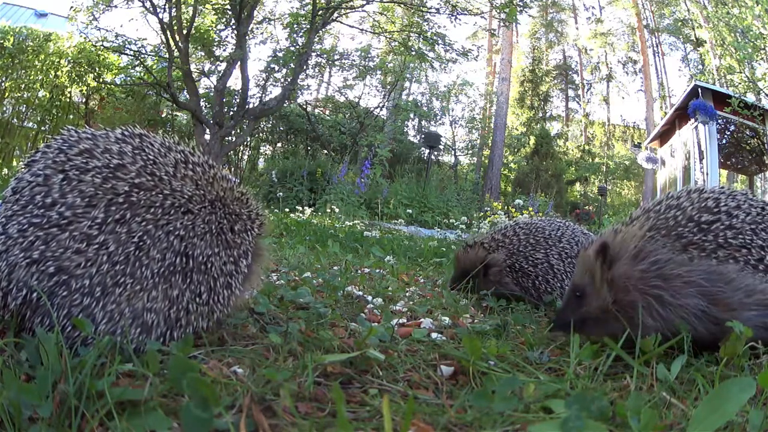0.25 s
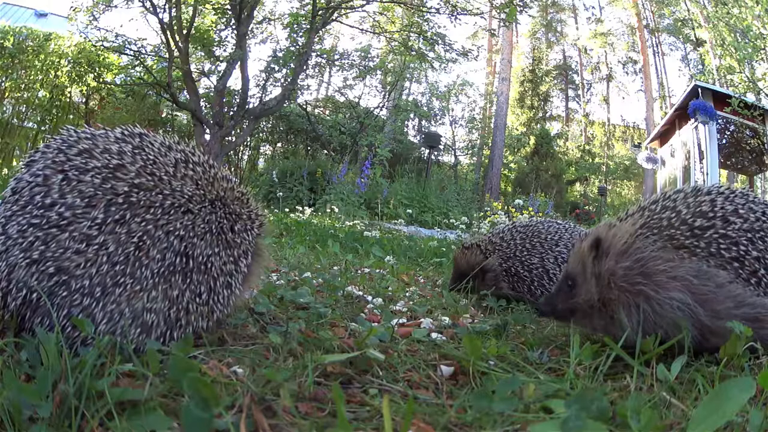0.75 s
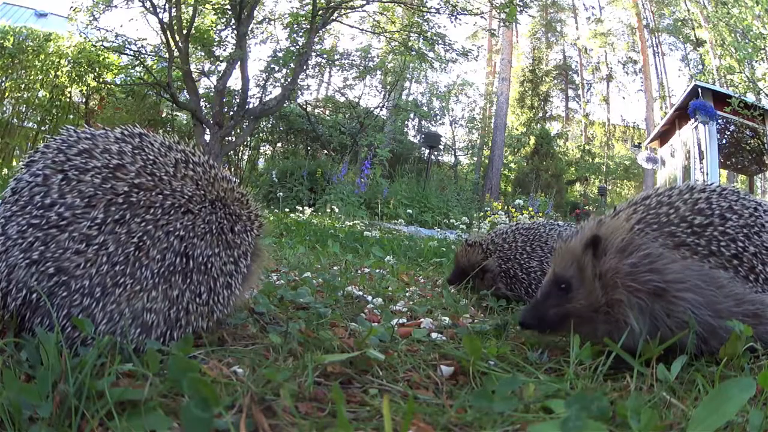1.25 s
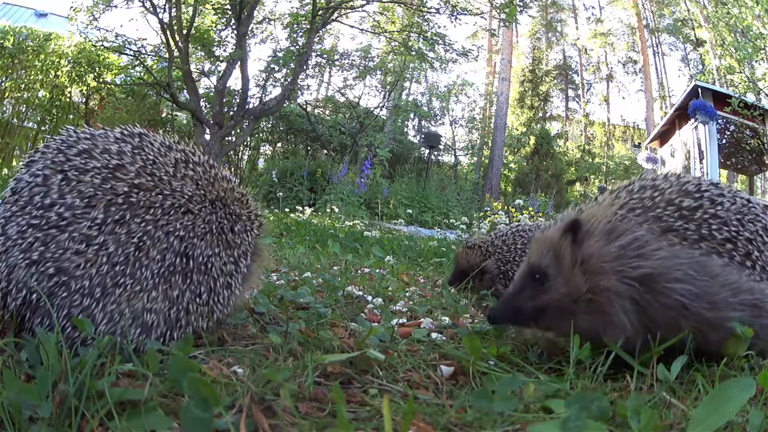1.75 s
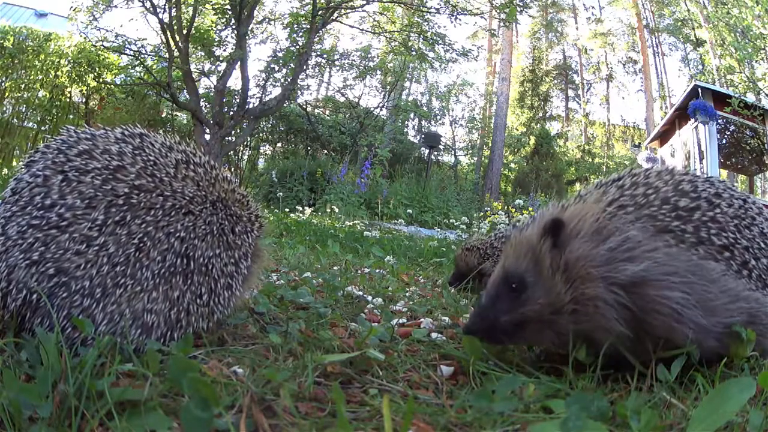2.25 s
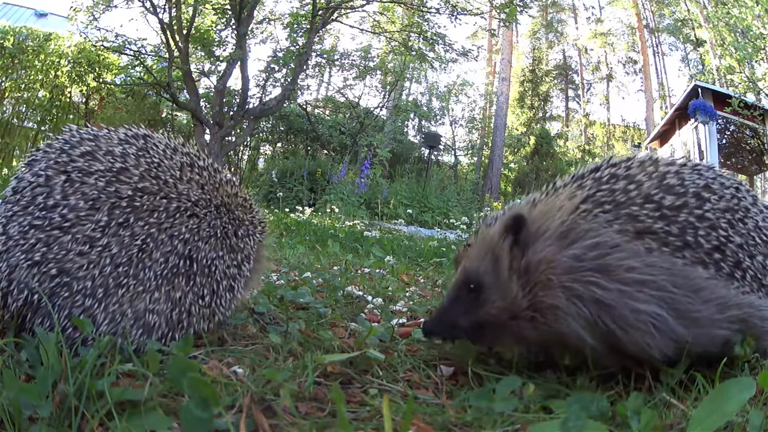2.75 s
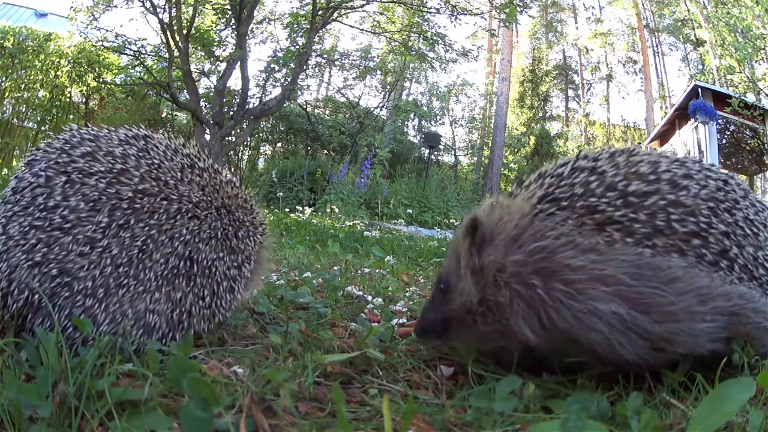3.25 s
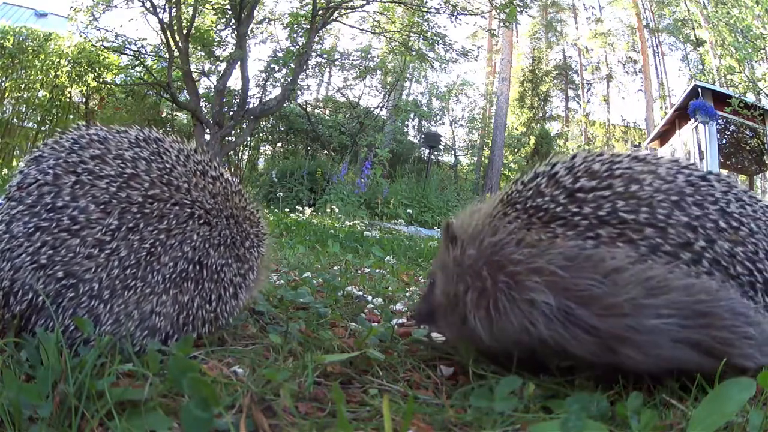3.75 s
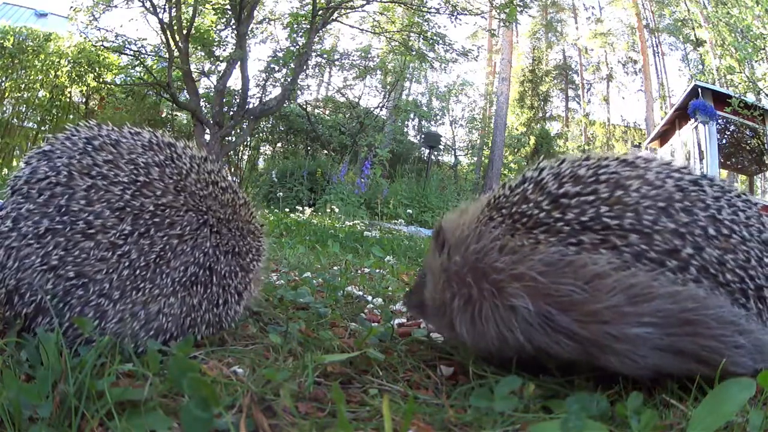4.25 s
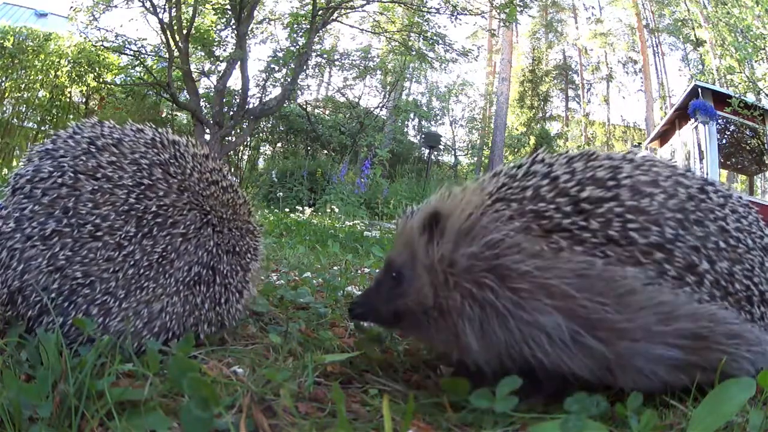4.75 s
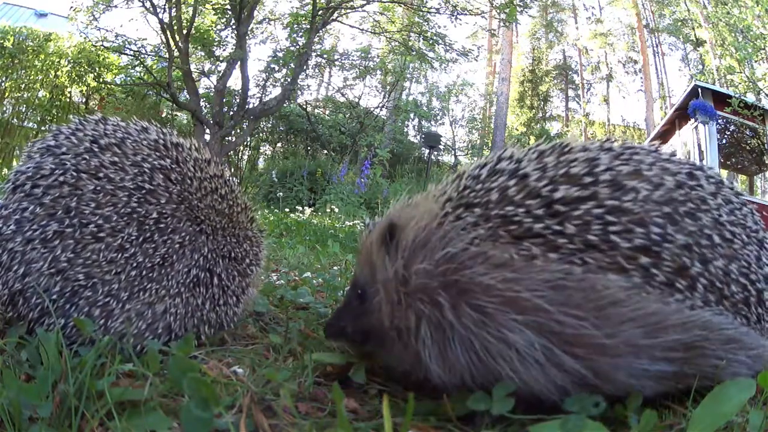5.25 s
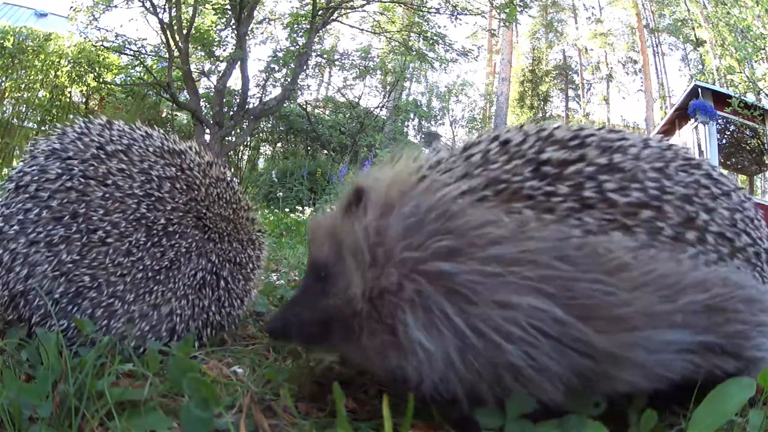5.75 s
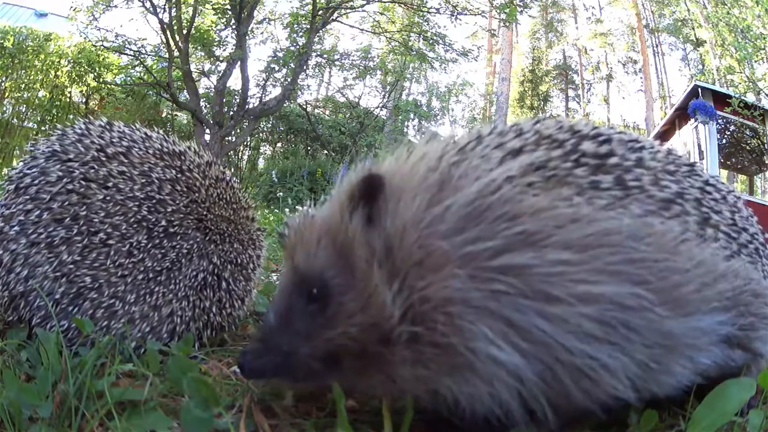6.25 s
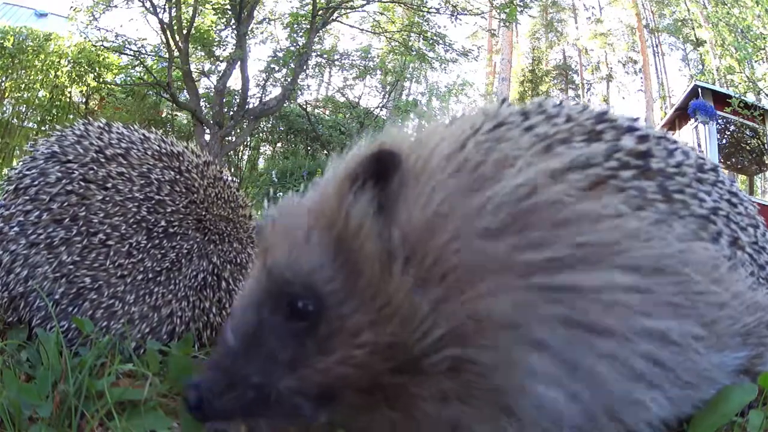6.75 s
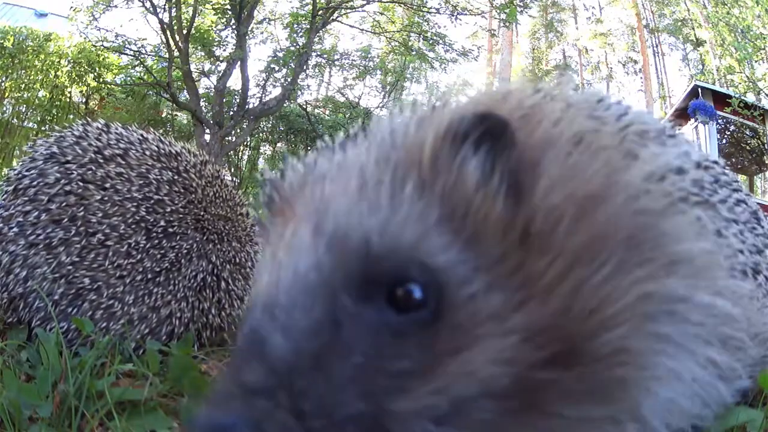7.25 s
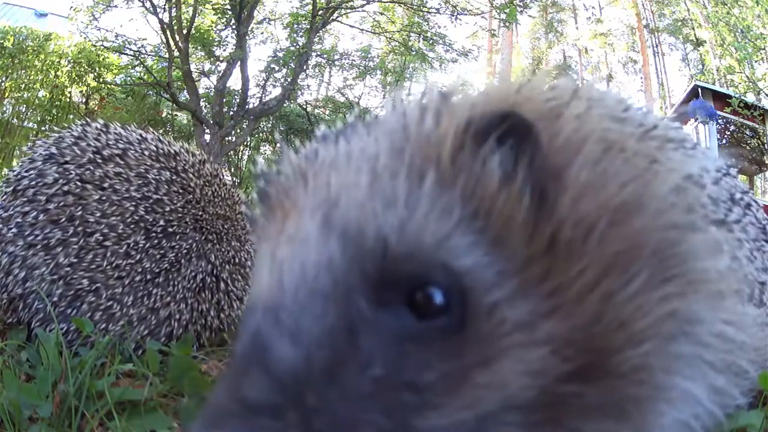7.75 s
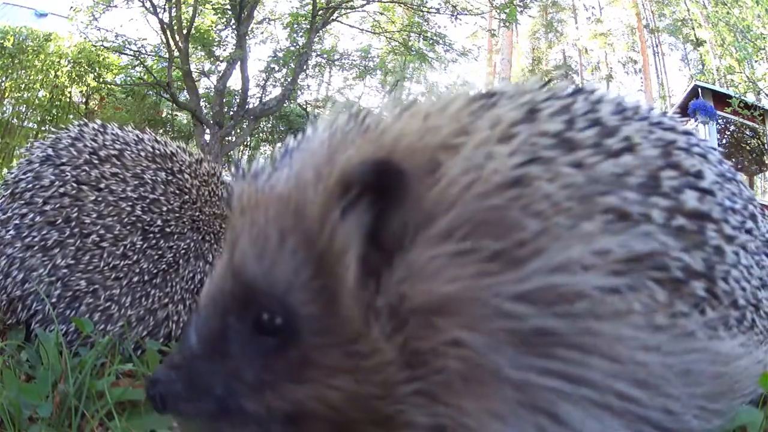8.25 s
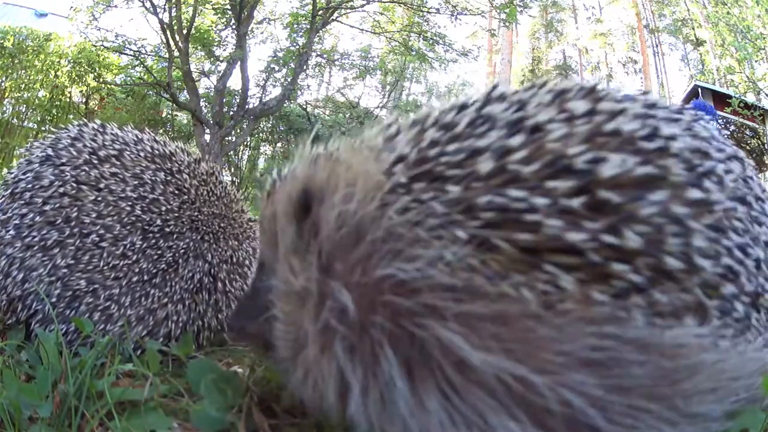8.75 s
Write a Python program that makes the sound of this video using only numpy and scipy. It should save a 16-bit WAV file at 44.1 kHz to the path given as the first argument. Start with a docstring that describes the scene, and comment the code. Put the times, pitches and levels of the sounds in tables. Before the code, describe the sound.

Outdoors in a quiet garden, a hedgehog gives short, sharp, noisy huffs about three a second. They start moderate, grow steadily as it walks from right to left toward a low microphone in the grass, peak very close and bright near seven seconds, then drop back. Light grass rustles, tiny crackles and dry stalk snaps accompany it, with a brief faint grunt and a distant harsh bird chatter.

```python
"""A hedgehog huffs about three times a second as it walks from right to left past a camera in the grass.
Each huff is a jet of noise through the snout: brighter when stronger, duller when the head turns away.
Noise bursts make the grass rustle, crackle and chirr; cracks with short rings make stalks snap.
Gliding sines make thin chirps, harmonics a small grunt from the left, rough noise a far magpie.
Shaped noise makes the faint steady rush and rumble of a garden."""
import sys
import numpy as np
from scipy import signal
from scipy.fft import rfft, irfft, next_fast_len
from scipy.io import wavfile
from scipy.ndimage import uniform_filter1d, map_coordinates

SR = 44100
rng = np.random.default_rng(int(sys.argv[2]) if len(sys.argv) > 2 else 0)


def transcribe(u):
    """Save the signal u as a 16-bit wav file named by the first command-line argument.

    u: samples, shape (n,) or (channels, n), limited to [-1, 1]; the rate is SR.
    q: integer samples, one column per channel.
    """
    v = np.clip(np.atleast_2d(u).T, -1, 1)
    q = np.round(v * 32767).astype(np.int16)
    wavfile.write(sys.argv[1], SR, q)


N = 396459

# Levels are relative: each source adds its own trim.
# garden spectrum: freq_hz, gain_db
GARDEN = [(18, -15), (30, -10), (64, -5), (150, -10), (620, -11.5), (1130, -14.5), (1700, -28), (2900, -32),
          (4200, -32.5), (5800, -39), (7200, -49), (10500, -49), (12500, -43.5), (16000, -45)]
# left-right likeness of the garden rush: freq_hz, correlation
ALIKE = [(60, 1), (180, 0.82), (550, 0.8), (1650, 0.051), (4970, 0.35), (15000, 1)]
# steps through the grass: start_s, length_s, level_db
RUSTLES = [(0.9, 0.16, -62.5), (1.37, 0.087, -68), (1.7, 0.12, -57), (2.12, 0.092, -59.5), (2.5, 0.14, -59),
           (3.35, 0.043, -46), (3.39, 0.12, -52.5), (4.08, 0.054, -63.5), (4.71, 0.051, -56.5),
           (5.05, 0.095, -58.5), (5.45, 0.14, -55), (6.11, 0.071, -57.5), (6.335, 0.066, -59),
           (8.44, 0.075, -64.5)]
# grass spectrum: freq_hz, gain_db
GRASS = [(700, -1), (2000, 1), (4000, -1), (7300, -9.5), (9000, -6.5), (10500, -10.5), (13000, 0.5),
         (15800, -4)]
# huffs: start_s, length_s, level_db, swell_db (start to end), hiss_db
HUFFS = [(0.056, 0.13, -35.5, 2, -7), (0.364, 0.15, -36, -1.5, -4.5), (0.767, 0.13, -35.5, 0, -3),
         (1.214, 0.14, -35.5, -2.5, -2.5), (1.567, .13, -33, -5, -1.5), (1.966, .14, -33, -0.5, 2.5),
         (2.374, .11, -34, 8.5, 2), (2.904, .12, -32, -0.5, -2.5), (3.258, 0.11, -34, -5.5, -3.5),
         (3.628, .12, -35, 1, -6), (3.956, 0.11, -31, 3.5, -4), (4.261, 0.14, -30.5, -1, -2),
         (4.591, .12, -30, -3, 0.5), (4.92, .12, -29, 0.5, 3), (5.309, .14, -28.5, -3.5, -3),
         (5.678, .13, -28.5, -4, -7.5), (5.983, .12, -27, -4, 0.5), (6.403, .11, -27.5, -5.5, 1.5),
         (6.774, .091, -25, 2, 3), (7.128, 0.092, -19.5, 0.5, 4), (7.415, .13, -19.5, 5, 2),
         (7.857, .12, -21, -10.5, 2), (8.33, 0.1, -28.4, -1.5, -3.5), (8.605, .11, -27, -2.5, 0),
         (8.928, 0.12, -26, 0.5, -3)]
# turbulence in the nostrils: freq_hz, gain_db
JET = [(40, -25), (100, -16), (170, -14.5), (230, -4.5), (300, -1), (600, -3.5), (1300, -7.0), (2700, -18),
       (7300, -32), (15500, -25.5)]
# humps and one trough of the snout response: centre_hz, half_width_hz, gain_db
NOSE = [(1003, 357, 10), (2050, 424, 6), (3966, 1140, 17), (6010, 600, 6.5), (7320, 202, -3.5),
        (8660, 930, 9), (12430, 1340, 7)]
# ground echo cancels one pitch, lower when the nose is raised or near: time_s, notch_hz
NOTCH = [(0, 2520), (.37, 2820), (.8, 2130), (2.37, 1800), (2.9, 2250), (3.6, 2680), (5.68, 2680),
         (6.4, 1940), (7.13, 1530), (7.86, 1700), (8.33, 2380), (8.9, 2780)]
# head turns away: middle_s, half_length_s, away_0_to_1
TURNS = [(3.805, 0.58, 1), (8.8, 0.23, 0.55)]
# walk from right to left: time_s, left_minus_right_db
PLACE = [(0, -2), (3, -0.1), (4.5, 0.2), (6.8, 3.4), (7.9, 4), (9, 2.5)]
# stems that bend and rub: start_s, length_s, level_db, ring_hz
RUBS = [(0.237, 0.028, -59.5, 3900), (1.379, 0.018, -58, 3900), (2.755, 0.072, -61.5, 2760),
        (7.027, .012, -62, 4000), (8.799, 0.014, -51.5, 3600)]
# thin falling chirps, perhaps a small bird: start_s, start_hz, level_db
CHIRPS = [(.585, 10400, -72), (1.415, 14900, -67), (3.828, 10800, -72)]
# dry stalks that snap: time_s, peak_db, ring_re_peak_db
TICKS = [(1.1827, -40, -13), (2.211, -47, 4), (2.3266, -31, -18), (2.3347, -30, -5.5), (2.6778, -31.5, -17),
         (2.797, -35, -6), (2.8205, -39, 0), (2.8534, -25, -26), (3.266, -34, -10), (3.378, -20, -30),
         (3.5894, -28.5, -14), (5.4698, -24, -16), (6.2988, -30, -14), (6.3162, -22, -15.5),
         (6.364, -32, -5), (6.3684, -32.5, -2.5), (7.5973, -34, -3)]
# stalk modes, before random detuning: freq_hz, level_db, t60_s
STALK = [(2640, -1.5, 0.01), (3860, 1.5, 0.0069)]
# grunt contour: time_s, pitch_hz (before jitter), level_db
GRUNT = [(2.255, 181, -66), (2.285, 196.7, -42.5), (2.31, 224.5, -46), (2.34, 259, -43.5),
         (2.385, 248, -51)]
# throat response: freq_hz, gain_db
THROAT = [(190, 5), (400, -13), (600, 6), (800, 3.5), (1100, -22), (1500, -6), (2000, -34)]
# harsh magpie notes: start_s, length_s, level_db
NOTES = [(7.651, 0.063, -50.5), (7.732, 0.068, -47), (7.812, 0.074, -45), (7.992, 0.075, -44.5),
         (8.072, 0.051, -53.0)]
# magpie syrinx spectrum: freq_hz, gain_db
SYRINX = [(300, -13), (900, 1), (1400, -7.5), (2350, 1.5), (3100, -12), (4200, -21), (5600, -13.5),
          (7300, -32), (9000, -26), (15500, -33)]
# signs of the left and right microphone: sign
SIDES = np.array([[1], [-1]])

HOLD_SHARE, RELEASE_SHARE = 0.89, 0.086  # of puff length: release half done, release softness
USUAL_HUFF_DB, USUAL_NOTCH_HZ = -30, 2270  # reference huff for the snout colour
TOP_HZ = 15950


def amp(db):
    """Amplitude factor of a level in dB."""
    return 10 ** (np.asarray(db) / 20)


def unit(x):
    """Scale to an RMS of 1."""
    return x / np.sqrt(np.mean(x ** 2) + 1e-20)


def along(points, hz):
    """Interpolate (freq_hz, value) points on a log frequency axis."""
    f, v = np.transpose(points)
    return np.interp(np.log(hz + 1), np.log(f + 1), v)


def curves(rows):
    """One value per sample for each column after the time."""
    time_s, *columns = np.transpose(rows)
    return [np.interp(np.arange(N) / SR, time_s, column) for column in columns]


def bell(hz, centre_hz, width_hz):
    """Hump of height 1 along frequency."""
    return np.exp(-((hz - centre_hz) / width_hz) ** 2)


def low_pass(hz, edge_hz):
    """Gain that falls steeply above its edge."""
    return 1 / (1 + (hz / edge_hz) ** 4)


def wobble(rate_hz, size=N):
    """Smooth random curve with rate_hz knots a second."""
    knots = rng.standard_normal(int(size * rate_hz / SR) + 4)
    return map_coordinates(knots, [np.arange(size) * rate_hz / SR])


def filtered(x, response):
    """Multiply the spectrum of x by a response of frequency."""
    size = x.shape[-1]
    padded = next_fast_len(size + 4096)
    hz = np.fft.rfftfreq(padded, 1 / SR)
    return irfft(rfft(x, padded) * response(hz), padded)[..., :size]


def add(track, start_s, sound):
    """Mix a sound into a track from start_s on."""
    start = max(round(start_s * SR), 0)
    part = sound[:max(N - start, 0)]
    track[start:start + len(part)] += part


def puff(length_s, lean_db=0, attack_share=0.09):
    """Flow of one puff: quick push, top that leans late or early, soft release."""
    progress = np.arange(SR // 3) / SR / length_s
    attack = 1 - np.exp(-progress / attack_share)
    release = (1 - np.tanh((progress - HOLD_SHARE) / RELEASE_SHARE / 2)) / 2
    lean = amp(lean_db * (np.minimum(progress, 1) - HOLD_SHARE / 2))
    return attack * release * lean


def swells(rows):
    """Summed puffs of (start_s, length_s, level_db) rows."""
    track = np.zeros(N)
    for start_s, length_s, level_db in rows:
        add(track, start_s, amp(level_db) * puff(length_s, attack_share=0.053))
    return track


def garden(rush_db=-47.0, waver_db=0.5, rumble_db=-58, rumble_hz=67, rumble_width_hz=9):
    """Far trees and roads: wide, nearly even noise over a narrow low drone."""
    # mid/side balance that gives the wanted left-right correlation
    turn = lambda hz: np.arccos(np.clip(along(ALIKE, hz), -1, 1)) / 2
    spread = lambda hz: amp(along(GARDEN, hz)) * [np.cos(turn(hz)), np.sin(turn(hz))]
    mid, side = filtered(rng.standard_normal((2, N)), spread)
    rush = unit(np.array([mid + side, mid - side])) * amp(rush_db + waver_db * wobble(7.4))
    drone = unit(filtered(rng.standard_normal(N), lambda hz: bell(hz, rumble_hz, rumble_width_hz)))
    return rush + amp(rumble_db) * drone


def grass(rustle_db=2, rest_db=-73, stir_db=-8, settle_s=0.79, grain_db=3.5,
          crackle_rate_hz=55, spread_db=5.0):
    """Blades brush past at each step; tiny crackles scatter all the time, stronger around steps."""
    colour = lambda hz: amp(along(GRASS, hz))
    steps = swells(RUSTLES)
    grainy = rng.standard_normal(N) * amp(grain_db * wobble(700))
    brush = unit(filtered(grainy, colour))
    hit_sizes = amp(spread_db * np.clip(rng.standard_normal(N), -2, 2))
    hits = (rng.random(N) < crackle_rate_hz / SR) * hit_sizes
    bursts = signal.lfilter([1], [1, -np.exp(-1 / (0.00019 * SR))], hits)  # 0.19 ms decay
    crackle = unit(filtered(bursts * rng.standard_normal(N), colour))
    stir = amp(rest_db) + amp(stir_db) * uniform_filter1d(steps, int(settle_s * SR))
    return amp(rustle_db) * steps * brush + stir * crackle


def snout(hz, force_db, raised, away, hiss_db):
    """Nose gain: fixed resonances, coloured by force, head lift, head turn and hiss."""
    db = along(JET, hz) + sum(gain_db * bell(hz, centre, width) for centre, width, gain_db in NOSE)
    push_db = 0.75 * max(force_db, 0)
    hollow_db = 7.1 * away - 0.4 + 0.087 * force_db
    nasal_db = -1.66 - 0.05 * force_db - 1.8 * away
    bright_db = 2.0 + 0.73 * force_db + 2.6 * raised - 4.5 * away
    return amp(db
               + push_db * bell(hz, centre_hz=60, width_hz=50)
               + hollow_db * bell(hz, centre_hz=2430, width_hz=660)
               + nasal_db * bell(hz, centre_hz=4040, width_hz=890)
               + bright_db * bell(hz, centre_hz=5840, width_hz=2200)
               + hiss_db * (1 - low_pass(hz, edge_hz=8300)))


def notch(hz, centre_hz, depth_db=-11, width_share=0.37):
    """Two paths to a microphone partly cancel around one frequency."""
    swing = centre_hz ** 2 - hz ** 2
    loss = 1j * hz * centre_hz * width_share
    return (swing + amp(depth_db) * loss) / (swing + loss)


def ports(hz, pan_db, mid_share=0.24, sheen_share=0.4, rasp_share=0.67):
    """Colour of direction: a mid-range side difference and two narrow peaks, strongest from the right."""
    peaks_db = 3.2 - 0.97 * pan_db
    return amp(mid_share * pan_db * SIDES * bell(hz, centre_hz=1100, width_hz=540)
               + rasp_share * peaks_db * bell(hz, centre_hz=4370, width_hz=350)
               + (peaks_db + sheen_share * pan_db * SIDES) * bell(hz, centre_hz=13200, width_hz=900))


def huffs(level_db=1.5, flutter_db=1.04, steepness=0.54, split_hz=3000, treble_db=1, drift_db=0.7,
          skew_per_db=-0.02, leaf_share=0.16):
    """Turbulent jets through the snout; treble grows faster than the flow and drifts a little."""
    track = np.zeros((2, N))
    for start_s, length_s, huff_db, lean_db, hiss_db in HUFFS:
        notch_hz = np.interp(start_s, *np.transpose(NOTCH))
        pan_db = np.interp(start_s, *np.transpose(PLACE))
        raised = np.log2(USUAL_NOTCH_HZ / notch_hz)
        away = sum(far * np.exp(-((start_s - middle_s) / half_s) ** 2) for middle_s, half_s, far in TURNS)
        force_db = huff_db - USUAL_HUFF_DB
        flow = puff(length_s, lean_db, attack_share=0.11)
        eddies = rng.standard_normal(len(flow)) * amp(flutter_db * wobble(249.6, size=len(flow)))
        # notch lies higher on the side the animal is on
        notches_hz = notch_hz * (1 - skew_per_db * pan_db * SIDES)
        # near leaf returns a weak copy; new delay per huff and microphone
        delay_s = rng.uniform(0.000295, 0.00119, (2, 1))
        leaf = lambda hz: 1 + leaf_share * hz / (hz + 1000) * np.exp(-2j * np.pi * hz * delay_s)
        path = lambda hz: notch(hz, notches_hz) * leaf(hz) * ports(hz, pan_db)
        nose = lambda hz: snout(hz, force_db, raised, away, hiss_db)
        air = unit(filtered(eddies, lambda hz: nose(hz) * path(hz)))
        body = filtered(air, lambda hz: low_pass(hz, split_hz))
        treble_gain = amp(treble_db + drift_db * wobble(33.5, size=len(flow))) * flow ** steepness
        huff = amp(huff_db + level_db) * flow * (body + treble_gain * (air - body))
        for channel, sound in zip(track, huff):
            add(channel, start_s, sound)
    return track


def rubs(level_db=2, width_hz=1100, slip_rate_hz=115, unevenness=0.25, fade_db=22):
    """A stem slips at an uneven rate; each slip is band noise that fades before the next: a soft chirr."""
    track = np.zeros(N)
    for start_s, length_s, rub_db, ring_hz in RUBS:
        flow = puff(length_s)
        rate_hz = slip_rate_hz * (1 + unevenness * wobble(100, size=len(flow)))
        cycle = np.cumsum(rate_hz) / SR % 1
        slips = rng.standard_normal(len(flow)) * amp(-fade_db * cycle)
        chirr = unit(filtered(slips, lambda hz: bell(hz, ring_hz, width_hz)))
        add(track, start_s, amp(rub_db + level_db) * flow * chirr)
    return track


def chirps(length_s=0.032, fall_hz_per_s=28000, waver_hz=90):
    """Faint, very high whistles: sines that slide down."""
    track = np.zeros(N)
    for start_s, start_hz, level_db in CHIRPS:
        flow = puff(length_s)
        slide_hz = start_hz - fall_hz_per_s * np.arange(len(flow)) / SR
        pitch_hz = slide_hz + waver_hz * wobble(120, size=len(flow))
        add(track, start_s, amp(level_db) * flow * np.sin(2 * np.pi * np.cumsum(pitch_hz) / SR))
    return track


def ticks(snap_db=-1, ring_db=4, snap_t60_s=0.0036):
    """A stalk breaks: a bright crack and a very short ring of detuned modes."""
    track = np.zeros(N)
    t = np.arange(SR // 40) / SR
    for time_s, peak_db, ring_re_peak_db in TICKS:
        # second difference brightens the noise
        crack = np.diff(rng.standard_normal(len(t) + 2), 2) * amp(-60 * t / snap_t60_s)
        ring = np.zeros(len(t))
        for mode_hz, mode_db, t60_s in STALK:
            detuned_hz = mode_hz * np.exp(0.12 * rng.standard_normal())
            ring += amp(mode_db - 60 * t / t60_s) * np.sin(2 * np.pi * detuned_hz * t)
        snap = amp(peak_db + snap_db) * crack / np.abs(crack).max()
        ringing = amp(peak_db + ring_re_peak_db + ring_db) * ring / np.abs(ring).max()
        add(track, time_s + 0.001, snap + ringing)
    return track


def grunt(jitter=0.055, count=9, pan_db=3.0, level_db=1):
    """Faint, rough, mostly rising grunt from the left: jittered harmonics through a throat response."""
    pitch_hz, contour_db = curves(GRUNT)
    t = np.arange(N) / SR
    on = (t > GRUNT[0][0]) & (t < GRUNT[-1][0])
    rough_hz = pitch_hz[on] * (1 + jitter * wobble(200, size=on.sum()))
    phase = 2 * np.pi * np.cumsum(rough_hz) / SR
    tone = sum(amp(along(THROAT, k * pitch_hz[on])) * np.sin(k * phase) for k in range(1, count + 1))
    track = np.zeros(N)
    track[on] = amp(contour_db[on] + level_db) * unit(tone)
    return track * amp(pan_db * SIDES / 2)


def surroundings(x, t60_s=0.12):
    """Scatter from trees and ground: a decaying noise tail, unlike at each microphone."""
    t = np.arange(SR // 2) / SR
    dull = filtered(rng.standard_normal((2, len(t))), lambda hz: 1 / (1 + hz / 4000))
    tail = dull * amp(-60 * t / t60_s)
    return signal.fftconvolve(x[None], tail / np.linalg.norm(tail[0]), axes=1)[:, :N]


def magpie(level_db=2, wood_db=-10, rasp_db=1.5):
    """Far burst of harsh chatter: rough noise through a syrinx response, blurred by the trees."""
    rasp = rng.standard_normal(N) * amp(rasp_db * wobble(500))
    voice = unit(filtered(rasp, lambda hz: amp(along(SYRINX, hz))))
    notes = amp(level_db) * swells(NOTES) * voice
    return notes + amp(wood_db) * surroundings(notes, t60_s=0.44)


def scene(scatter_db=-30, shadow_hz=520):
    """The animal crosses from right to left; the camera body shades only the higher sound."""
    animal = huffs() + grass() + rubs() + ticks()
    bass = filtered(animal, lambda hz: low_pass(hz, shadow_hz))
    pan_db = curves(PLACE)[0]
    direct = bass + (animal - bass) * amp(pan_db * SIDES / 2)
    scatter = amp(scatter_db) * surroundings(animal.mean(axis=0))
    return direct + scatter + grunt() + magpie() + chirps() + garden()


def record(dry):
    """Steep low-pass of the camera: a 200 Hz wide slope centred on TOP_HZ, nothing above it."""
    return filtered(dry, lambda hz: np.clip((TOP_HZ - hz) / 200 + 0.5, 0, 1))


dry = scene()
out = record(dry)
transcribe(out)
```